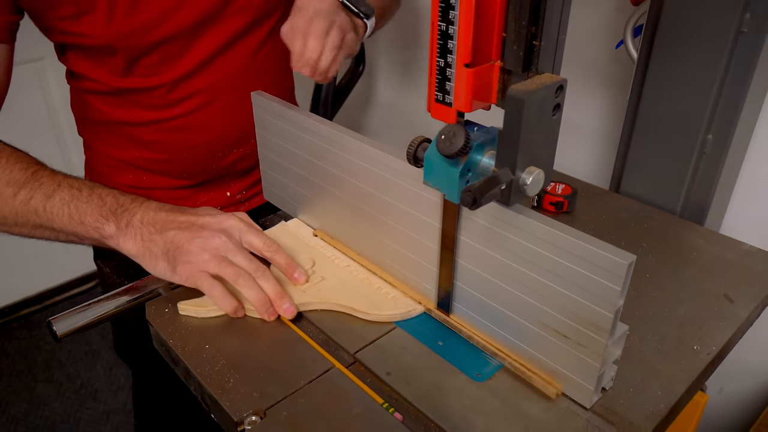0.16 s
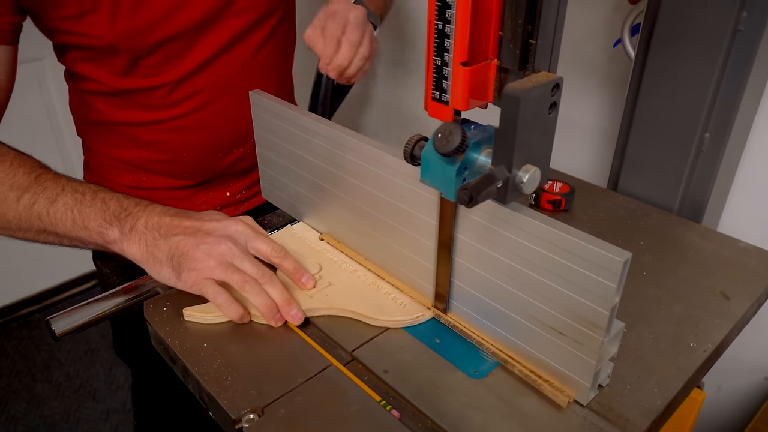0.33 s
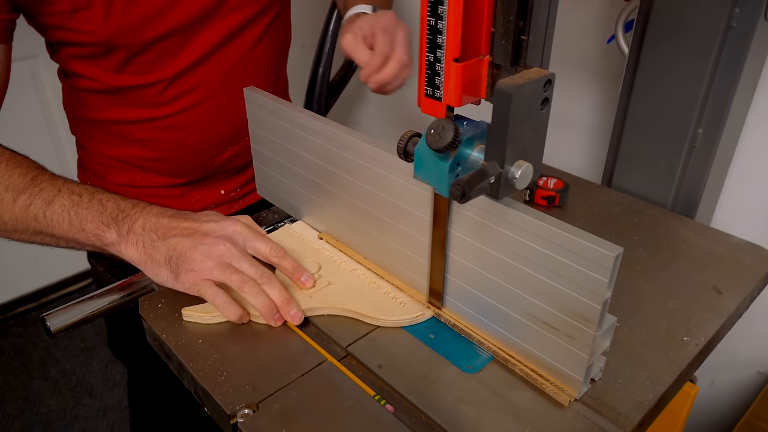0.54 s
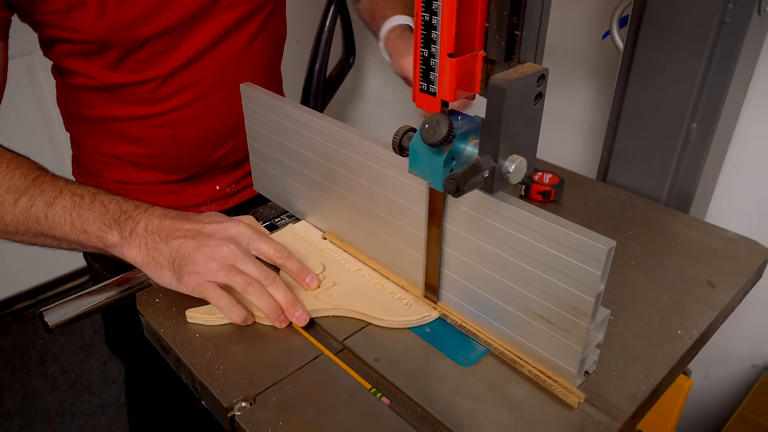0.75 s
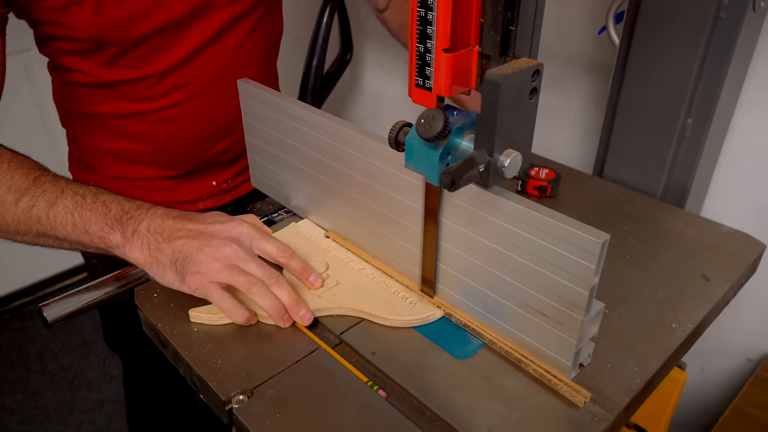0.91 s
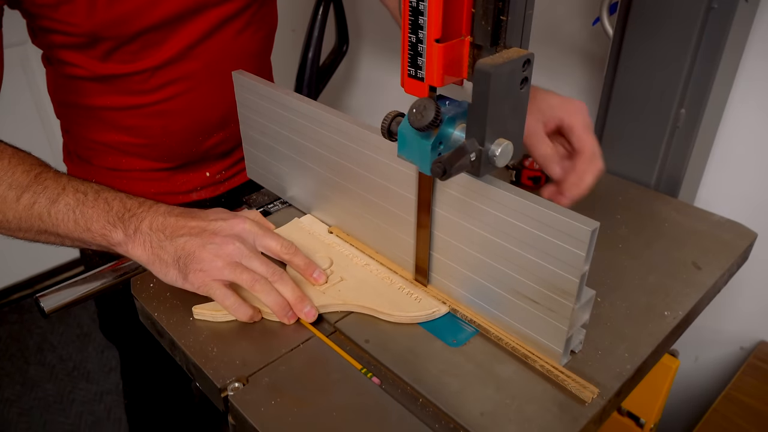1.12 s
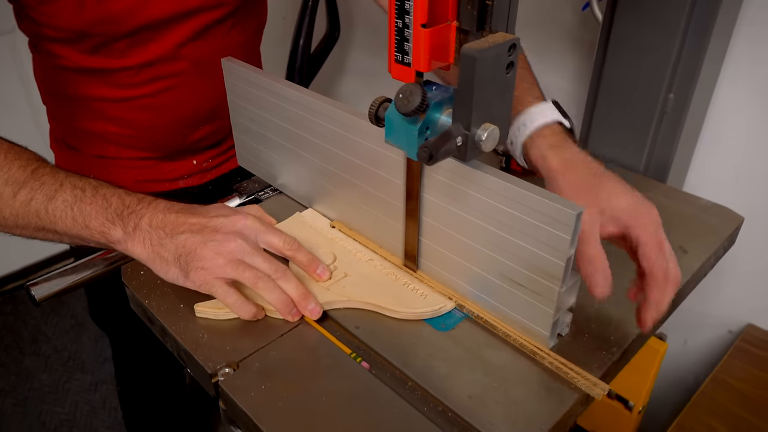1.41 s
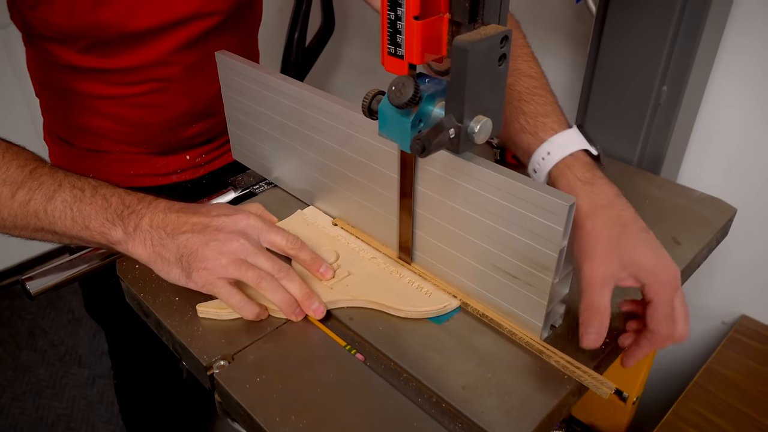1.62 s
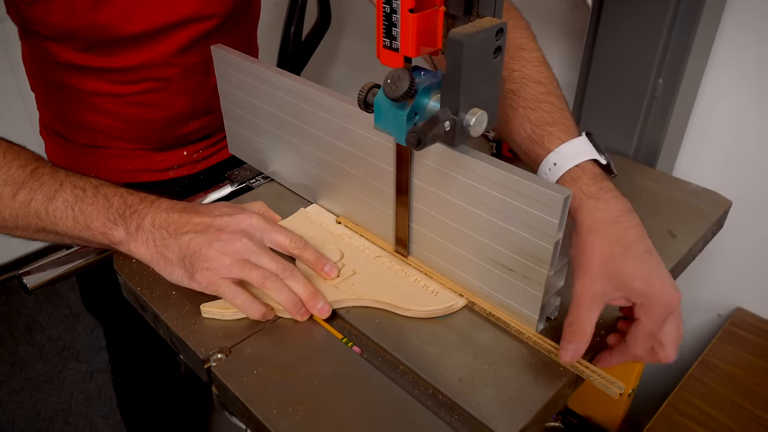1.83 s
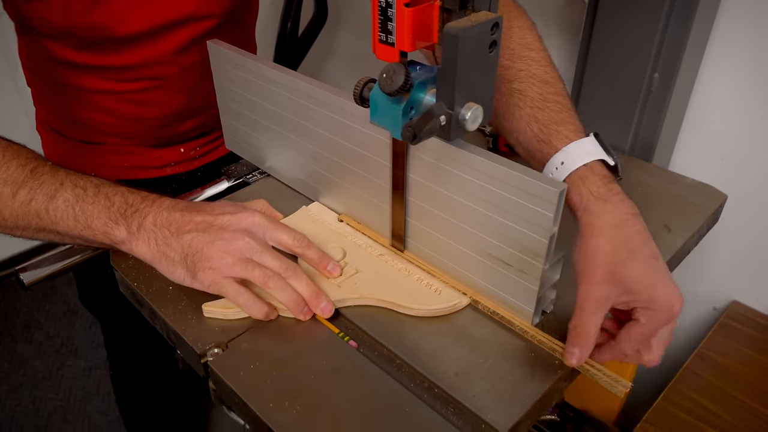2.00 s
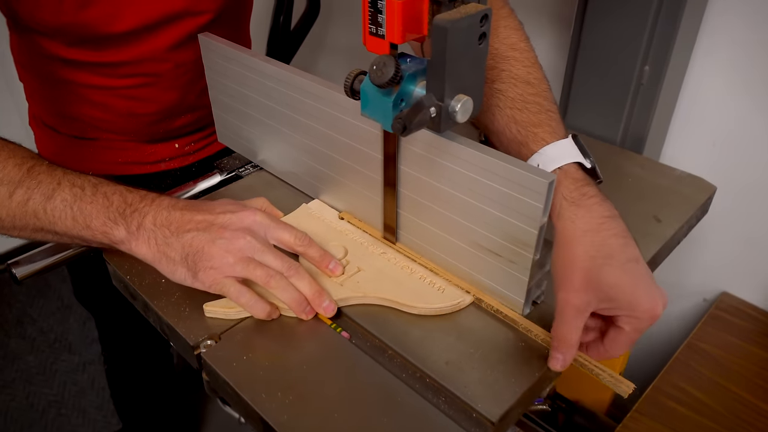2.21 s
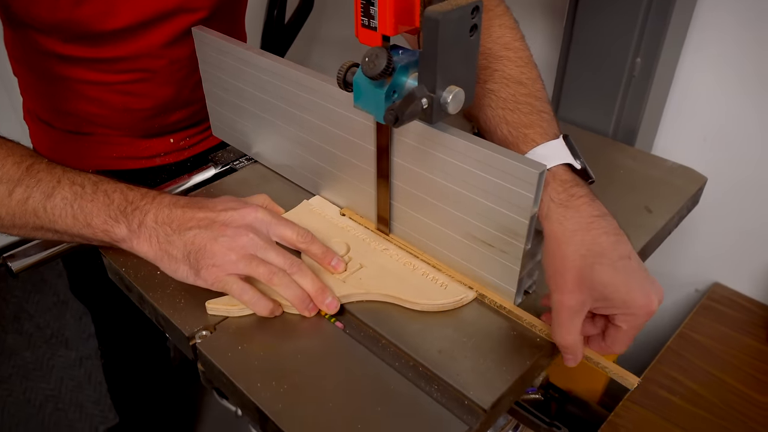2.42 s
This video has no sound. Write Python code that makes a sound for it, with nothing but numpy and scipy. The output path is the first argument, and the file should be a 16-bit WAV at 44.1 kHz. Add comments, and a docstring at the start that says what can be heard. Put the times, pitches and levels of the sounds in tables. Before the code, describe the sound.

A bandsaw cuts a thin wooden strip throughout, close and dry, with bright gritty tearing, singing tooth tones and low motor hum. It starts strong, surges near 0.4 s, drops briefly around 0.5 s, then resumes with a marked rapid throb and shifting whines. Small grabs come at 1.15-1.5 s, a short knock at 1.47 s, then a steadier, hissier, higher-pitched cut continues to 2.5 s without stopping.

```python
"""A bandsaw rips a thin wooden strip in a workshop. The teeth strike periodically and sing as a stack of
near-harmonic partials, some of which swell for a while; noise puffs and ticks, shaped in bands, tear the chips.
The drive throbs through the cut, the feed pressure swells and eases, and the blade briefly grabs the wood.
Wavering hum lines and low filtered noise make the motor and frame, filtered noise the steady blade hiss,
and one short noise burst the knock of the strip against the fence."""
import sys
import numpy as np
from scipy import signal
from scipy.fft import rfft, irfft
from scipy.io import wavfile
from scipy.ndimage import uniform_filter1d

SR = 44100
rng = np.random.default_rng(int(sys.argv[2]) if len(sys.argv) > 2 else 0)


def wrap_up_sound(samples):
    """Save the sound to the file named by the first command line argument, as 16-bit audio."""
    columns = np.atleast_2d(samples).T
    # keep every value between -1 and 1, then stretch to whole-number steps
    tamed = np.clip(columns, -1, 1)
    steps = np.round(tamed * 32767).astype(np.int16)
    wavfile.write(sys.argv[1], SR, steps)


N = 112454
T = np.arange(N) / SR  # time in s

TOOTH_HZ = 339.15  # repetition rate of the tooth pattern
DRIVE_HZ = 16.725  # rotation that makes the cut throb

# Harmonics of the drive rotation, before depth scaling and limiting: multiple, depth_db, delay_s
THROB_HARMONICS = [(3, 1.5, 0.017), (4, 0.47, 0.0061), (5, 0.55, 0.0087), (6, 0.5, 0.0028)]


def gain_of(db):
    """Amplitude ratio of a level in decibels."""
    return 10 ** (np.asarray(db) / 20)


def evened(x):
    """Normalisation to an rms of 1."""
    return x / np.sqrt(np.mean(x ** 2) + 1e-20)


def read(points, hz):
    """Spectral curve interpolated along logarithmic frequency."""
    point_hz, value = np.transpose(points)
    return np.interp(np.log(hz + 1), np.log(point_hz + 1), value)


def column(table, k):
    """One column of a table, interpolated linearly in time."""
    rows = np.array(table, float)
    return np.interp(T, rows[:, 0], rows[:, k])


def wander(rate_hz, count):
    """Smooth random curves of rms 1: sums of slow sines with random rates and phases."""
    centres_hz = np.geomspace(rate_hz / 10, rate_hz, 12)
    coarse_s = T[::64]
    sine_hz = centres_hz[:, None] * rng.uniform(.8, 1.2, (count, 12, 1))
    start_turns = rng.random((count, 12, 1))
    sines = np.sin(2 * np.pi * (sine_hz * coarse_s + start_turns))
    return [evened(np.interp(T, coarse_s, curve)) for curve in sines.sum(1)]


def band_shares(hz):
    """Overlapping filter bank: triangular weights on logarithmic frequency that sum to 1."""
    # Centres of the bands of the tearing noise: centre_hz
    centres_hz = [750, 1700, 3600, 5900, 7800, 10800]
    return np.array([np.interp(np.log(hz + 1), np.log(centres_hz), one) for one in np.eye(len(centres_hz))])


def feed_pressure_db():
    """Feed pressure as a slow level envelope: harder feeding makes the cut louder."""
    # Feed pressure as a level before later gains: time_s, level_db
    feed = [(0, -24.5), (.28, -23.5), (.3, -28.5), (.38, -21), (.455, -28), (.47, -34.5), (.535, -33.5),
            (.56, -26), (.76, -29), (.87, -22), (.89, -26.5), (1.03, -24.5), (1.05, -28), (1.16, -23.5),
            (1.19, -26.5), (1.27, -25), (1.3, -29), (1.36, -26.5), (1.5, -25.5), (2.55, -26.5)]
    return column(feed, 1)


def throb_db():
    """Amplitude modulation by drive harmonics, uneven grain and unequal bites, limited by saturation."""
    # Strength of the throb: time_s, depth_scale
    depth = [(0, 0.28), (.57, 2.17), (.75, 1.63), (1.2, 1.1), (2.55, 1.6)]
    top_db = 5  # limit before the shares applied to each layer
    throb = sum(db * np.cos(2 * np.pi * multiple * DRIVE_HZ * (T - delay_s))
                for multiple, db, delay_s in THROB_HARMONICS)
    grain = wander(rate_hz=90, count=1)[0]
    tooth = (TOOTH_HZ * T).astype(int)
    bite = uniform_filter1d(rng.standard_normal(tooth[-1] + 1)[tooth], size=16)
    drive = column(depth, 1) * throb + 0.49 * grain + 1.23 * bite
    # The teeth are either in the wood or clear of it, which squares the throb off.
    return top_db * np.tanh(drive / 3.8)


def tooth_puffs():
    """Impulsive excitation: decaying noise at every tooth, of uneven size, and one tick per tooth period."""
    tick_height = 5.5  # scaled by 0.5 to 1.5 for each tick
    turns = TOOTH_HZ * T
    teeth_done = int(turns[-1])
    size = gain_of(0.44 * rng.standard_normal(teeth_done + 1))[turns.astype(int)]
    decay = np.exp(-(turns % 1) / 0.65)  # time constant in tooth periods
    puffs = (0.91 + size * decay) * rng.standard_normal(N)
    # Each tick falls at a random moment within its tooth period.
    tick_at = (np.arange(teeth_done) + rng.uniform(0, 1, teeth_done)) * SR / TOOTH_HZ
    sign = rng.choice([-1, 1], teeth_done)
    puffs[tick_at.astype(int)] += tick_height * (.5 + rng.random(teeth_done)) * sign
    return puffs


def tearing(feed_db, throb, grabs):
    """Source and filter: tooth puffs through a moving strip resonance and separately modulated bands."""
    # Colour of the tearing noise before band levelling: frequency_hz, relative_db
    tear_colour = [(180, -53), (300, -34.5), (476, -21.5), (571, -28), (684, -11.5), (862, -20.5),
                   (1320, -8), (1540, -10), (2000, -0.5), (2870, -4.5), (3680, -2), (6030, 6.5), (11100, 9),
                   (13500, -3.5), (15400, -53)]
    # Broad strip resonance that moves as the strip is fed: time_s, centre_hz, lift_db
    strip = [(0, 6100, 3), (.3, 5560, 3.5), (.45, 6640, 7.5), (.7, 7550, 9.5), (.85, 7600, 5.5),
             (1.1, 7640, 14.5), (1.4, 6800, 7.5), (1.5, 8800, 12), (1.9, 9800, 6.5), (2.2, 8460, 8.5),
             (2.55, 9800, 9.5)]
    # Band levels relative to the feed: time_s, low_db, body_db, mid_db, upper_mid_db, bright_db, top_db
    band_levels = [(0.03, -14.5, -3.5, -9, -3.5, -2.5, -7), (0.15, -15.5, -7, -7, -2, -3.5, -11.5),
                   (0.3, -19.5, -4.5, -6, -5, -2.5, -8), (0.42, -15.5, -5.5, -4.5, -11.5, -6, -11),
                   (0.5, -9, -5, 1.5, -10, -5, 0.5), (0.6, -18.5, -5.5, -5, -10, -8, -6),
                   (0.72, -13, -9.5, -3, -11, -6, -3), (0.85, -16.5, -10, -8, -9, -7.5, -11),
                   (1.0, -13.5, -6.5, -6, -0.5, -9, -4.5), (1.2, -12.5, -7.5, -4, -7.5, -13, -11),
                   (1.35, -14.5, -5.5, -5, -13, -5, -3.5), (1.5, -15, -9.5, -12, -10.5, -12, -5),
                   (1.75, -15.5, -10, -9, -11, -13, -8.5), (2.05, -16.5, -13.5, -8.5, -18, -7, -7),
                   (2.3, -13.5, -13, -10.5, -9.5, -9, -2), (2.52, -10.5, -7, -7.5, -10, -10, -8.5)]
    # Part of the throb in each band, low to top: share
    throb_share = [0.2, 0.22, 0.85, 0.66, 1.33, 0.45]
    # Part of the grabs in each band, low to top: share
    grab_share = [1.16, 1.9, 0.41, 1.1, 0.7, 0.64]
    strip_width_hz = 680  # from the centre to where the lift in dB falls to 1/e

    hz, frame_s, spectrum = signal.stft(tooth_puffs(), SR, nperseg=512)
    # Noise smoothed over frequency, then over time, makes the spectrum patchy.
    patches = uniform_filter1d(rng.standard_normal(spectrum.shape), 5, 0)
    patches = evened(uniform_filter1d(patches, 24, 1))
    centre_hz = np.interp(frame_s, T, column(strip, 1))
    lift_db = np.interp(frame_s, T, column(strip, 2))
    strip_db = lift_db * np.exp(-((hz[:, None] - centre_hz) / strip_width_hz) ** 2)
    spectrum = spectrum * gain_of(read(tear_colour, hz)[:, None] + 1.04 * patches + strip_db)

    shares = band_shares(hz)
    flicker = wander(rate_hz=91, count=len(shares))
    out = np.zeros(N)
    for k, share in enumerate(shares):
        band = evened(signal.istft(spectrum * share[:, None], SR, nperseg=512)[1][:N])
        level_db = feed_db + column(band_levels, k + 1) + 1.98 * flicker[k]
        modulation_db = throb_share[k] * throb + grab_share[k] * grabs
        out += band * gain_of(level_db + modulation_db)
    return gain_of(-6.0) * out


def teeth(feed_db):
    """Additive synthesis: periodic strikes give near-harmonic partials with drifting levels and phases."""
    # Partials of the tooth pattern, levels before modulation; multiples are rounded for pitch:
    # multiple, early_db_rms, late_db_rms
    partials = [(2, -52.5, -46), (3, -50, -50), (4, -65, -43.5), (5, -48.5, -52.5), (5.96, -57, -54),
                (7, -47, -50), (8, -46, -55), (9, -51, -51), (10, -49.5, -51), (10.9, -48.5, -47),
                (13, -45.5, -53), (14, -70, -55), (15, -53, -45), (17, -47, -65), (18.9, -54, -48.0),
                (20, -65, -48), (21, -60, -47.5), (22.2, -46.5, -47.5), (23, -44, -47), (24, -49.5, -49),
                (25, -61, -59), (26, -78, -47), (27, -69, -65), (28.2, -54.5, -65), (29, -55, -43),
                (30.2, -60, -44.5), (31, -64, -57.0), (32, -48.5, -46.5), (33, -60, -50), (34, -51.5, -58),
                (35, -60, -45), (36, -64, -50), (37, -66.0, -53), (38, -62, -61.0), (41, -75.0, -58),
                (43, -81, -69)]
    # A partial sings out for a while, level before modulation: start_s, length_s, multiple, level_db_rms
    swells = [(0.0, 0.37, 17, -39.5), (0.02, 0.14, 19, -40), (0.034, 0.42, 4, -34), (0.045, 0.12, 24, -37),
              (0.116, 0.28, 6, -34.5), (0.13, 0.16, 8, -40.5), (0.243, 0.15, 9, -39), (0.278, 0.1, 19, -37),
              (0.295, 0.086, 13, -38), (0.314, 0.22, 11, -42.5), (0.328, 0.11, 8, -39),
              (0.56, 0.37, 13, -38), (0.556, 0.19, 11, -36.5), (0.57, 0.53, 4, -36),
              (0.587, 0.12, 8, -38.5), (0.599, 0.15, 9, -38.5), (0.592, 0.3, 19, -39.5),
              (0.712, 0.14, 24, -37.5), (0.72, 0.14, 23, -37), (0.778, 0.067, 20, -34.5),
              (0.792, 0.087, 9, -38.5), (0.803, 0.18, 28, -41.5), (0.82, 0.095, 22, -38),
              (0.854, 0.21, 17, -37.5), (0.894, 0.42, 20, -37.5), (0.913, 0.13, 23, -35.5),
              (0.916, 0.59, 3, -42), (0.954, 0.15, 9, -41.3), (1.236, 0.033, 11, -35.5),
              (1.243, 0.053, 6, -38.5), (1.25, 1.5, 28, -36.5), (1.293, 0.16, 19, -40),
              (1.3, 0.4, 17, -44.5), (1.328, 0.043, 11, -35.5), (1.33, 0.57, 4, -42),
              (1.43, 0.12, 2, -43.5), (1.25, 0.29, 9, -42.5), (1.462, 0.17, 6, -43.5),
              (1.484, 0.41, 11, -36.5), (1.508, 0.16, 26, -45), (1.657, 0.071, 26, -43),
              (1.723, 0.22, 24, -40), (1.816, 0.11, 26, -37.5), (1.89, 0.29, 32, -36),
              (2.018, 0.27, 2, -44.5), (2.024, 0.25, 26, -43), (1.75, 0.19, 13, -46),
              (2.03, 0.18, 13, -41.5), (2.097, 0.42, 9, -41.5), (2.13, 0.33, 24, -39.5),
              (2.152, 0.13, 25, -39), (2.23, 0.49, 19, -41), (2.414, 0.37, 2, -42.4),
              (2.416, 0.092, 32, -38)]
    # Two low partials sit slightly off the stack: multiple: offset_hz
    detune_hz = {2: 2, 4: -2}
    change_s, change_len_s = 1.16, 0.41  # centre and length of the early-to-late crossfade
    drift_db = 2  # rms of the slow level drift outside swells
    follow = 0.56  # how far the partials follow quick changes of feed pressure
    flutter_rad, flutter_step_rad = 0.23, 0.12  # phase shake by the throb; its offset per multiple

    late = np.clip((T - change_s) / change_len_s + .5, 0, 1)
    quick_db = follow * (feed_db - uniform_filter1d(feed_db, SR // 4))
    count = len(partials)
    drifts, sways = wander(rate_hz=7, count=count), wander(rate_hz=14, count=count)
    flickers, jitters = wander(rate_hz=70, count=count), wander(rate_hz=45, count=count)
    start_turns = rng.random(count)
    beat_multiple, _, beat_delay_s = THROB_HARMONICS[0]
    beat = 2 * np.pi * beat_multiple * DRIVE_HZ * (T - beat_delay_s)

    out = np.zeros(N)
    for i, (multiple, early_db, late_db) in enumerate(partials):
        order = round(multiple)
        size = gain_of(early_db + late * (late_db - early_db) + drift_db * drifts[i])
        for start_s, length_s, swell_multiple, db in swells:
            if round(swell_multiple) == order:
                edge_s = 0.026 + 0.41 * length_s
                inside_s = np.minimum(T - start_s, start_s + length_s - T)
                on = np.clip(inside_s / edge_s + .5, 0, 1)
                swell_size = gain_of(db + 0.16 * drift_db * drifts[i])
                size = size + on * (swell_size - size)
        hz = order * TOOTH_HZ + detune_hz.get(order, 0)
        flutter = flutter_rad * np.sin(beat + flutter_step_rad * multiple)
        shake = 0.6 * sways[i] + 0.18 * jitters[i] - flutter
        tone = np.cos(2 * np.pi * (hz * T + start_turns[i]) + shake)
        out += size * gain_of(1.67 * flickers[i]) * tone
    return np.sqrt(2) * gain_of(quick_db) * out


def blade_hiss():
    """Stationary broadband noise, band-limited by filters: the even hiss of blade and guides."""
    band = signal.butter(2, [900, 11900], "band", fs=SR, output="sos")
    top = signal.butter(8, 12800, fs=SR, output="sos")
    hiss = signal.sosfilt(top, signal.sosfilt(band, rng.standard_normal(N)))
    return gain_of(-57) * evened(hiss)


def motor():
    """Tonal hum and structural rumble: sines of wavering level over spectrally shaped noise."""
    # Motor and frame lines, before waver and machine level: frequency_hz, level_db_rms
    hum_lines = [(50.2, -84), (120, -58), (250.7, -54.5), (450.1, -57.5), (480.1, -51.5), (629.8, -64.5)]
    # Colour of the rumble: frequency_hz, relative_db
    rumble_colour = [(18, -64), (30, -34), (108, -7.5), (183, -9.5), (245, 3), (377, -10), (475, -2.5),
                     (563, -5.5), (678, -21), (1200, -6.5), (1560, -6), (2640, -120)]
    # Level of hum and rumble together: time_s, level_db
    machine_level = [(0, -2), (.3, -5), (.5, -0.5), (1.1, -2.5), (2.55, 2)]
    rumble_db = -48.5  # rms, before the machine level
    wavers, start_turns = wander(rate_hz=5.86, count=len(hum_lines)), rng.random(len(hum_lines))
    hum = np.zeros(N)
    for (hz, db), waver, start in zip(hum_lines, wavers, start_turns):
        hum += np.sqrt(2) * gain_of(db + 2.2 * waver) * np.sin(2 * np.pi * (hz * T + start))
    shape = gain_of(read(rumble_colour, np.fft.rfftfreq(N, 1 / SR)))
    rumble = evened(irfft(rfft(rng.standard_normal(N)) * shape, N))
    return gain_of(column(machine_level, 1)) * (hum + gain_of(rumble_db) * rumble)


def grabs_db():
    """Transient level modulation: short flat-topped jumps where the blade grabs the wood."""
    # Grabs, heights before the share of each layer: centre_s, extra_db, length_s
    grab_times = [(0.418, 5, 0.006), (1.156, 2, 0.014), (1.247, 2.5, 0.023), (1.278, 3, 0.0061),
                  (1.34, 5.5, 0.0074), (1.475, 3, 0.019), (1.801, 4.5, 0.035), (1.947, 6, 0.0082),
                  (2.182, 3, 0.014)]
    return sum(db * np.exp(-(2 * (T - centre_s) / length_s) ** 4) for centre_s, db, length_s in grab_times)


def knocks():
    """Impact as gated band-passed noise: the strip knocks against the fence."""
    # Knocks: start_s, length_s, level_db_rms
    knock_times = [(1.4665, 0.012, -25)]
    # Band of the knock: low and high edge_hz
    band_hz = [515, 5200]
    sos = signal.butter(3, band_hz, "band", fs=SR, output="sos")
    noise = evened(signal.sosfilt(sos, rng.standard_normal(N)))
    envelope = np.zeros(N)
    for start_s, length_s, db in knock_times:
        inside_s = np.minimum(T - start_s, start_s + length_s - T)
        envelope += gain_of(db) * np.clip(inside_s * 1000, 0, 1)  # 1 ms edges
    return noise * envelope


def scene():
    """Superposition: the modulated cut, the knock and the running machine add linearly."""
    feed_db, throb, grabs = feed_pressure_db(), throb_db(), grabs_db()
    singing = gain_of(1.12 * throb + 0.49 * grabs) * teeth(feed_db)
    cut = tearing(feed_db, throb, grabs) + singing
    return (cut + blade_hiss() + motor() + knocks())[None]


def record(dry):
    """Band limitation by a linear-phase low-pass filter, centred so that it adds no delay."""
    low_pass = signal.firwin(511, 15400, window=("kaiser", 9), fs=SR)
    return signal.oaconvolve(dry, low_pass[None], "same")


dry = scene()
out = record(dry)
wrap_up_sound(out)
```